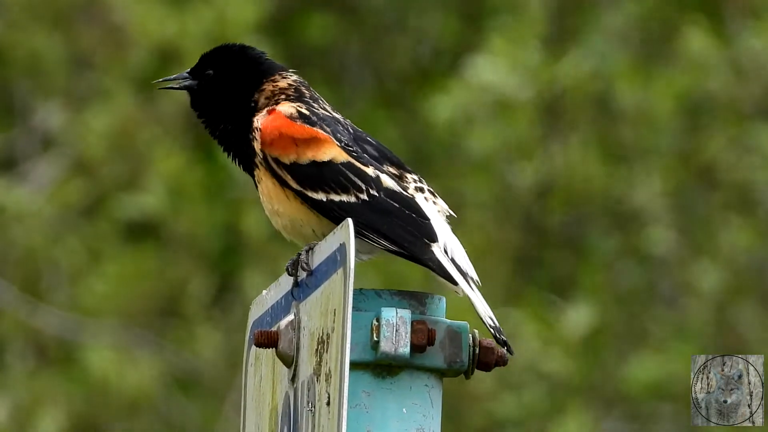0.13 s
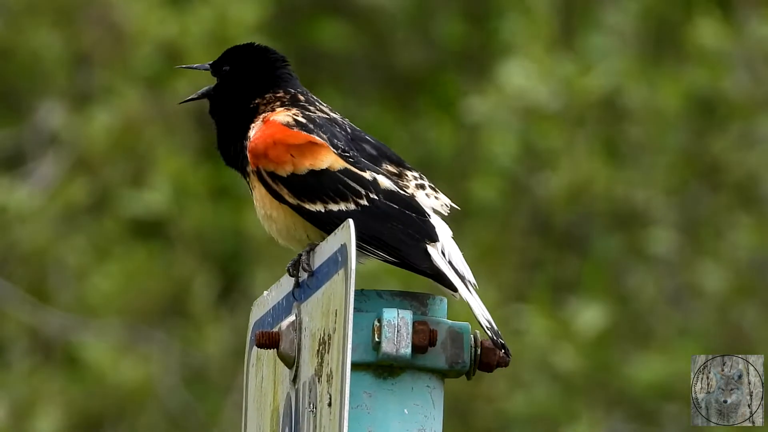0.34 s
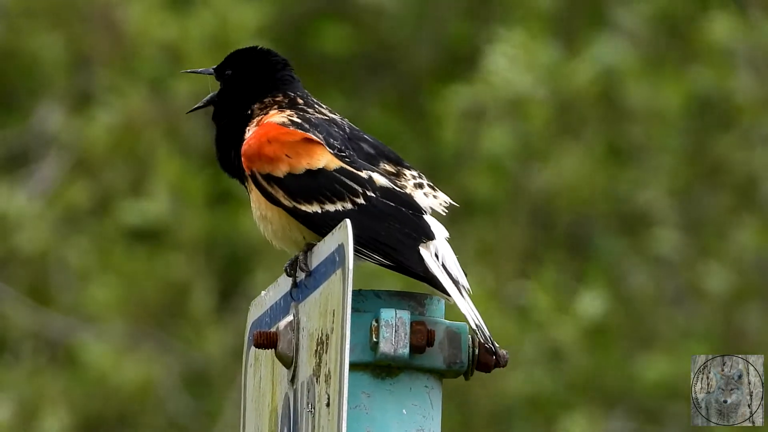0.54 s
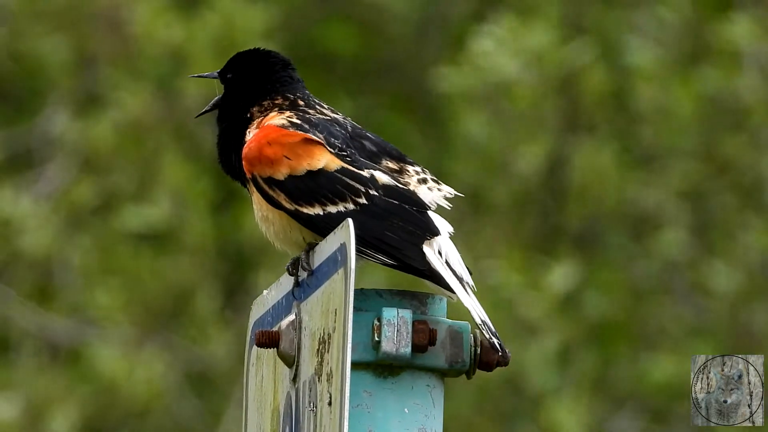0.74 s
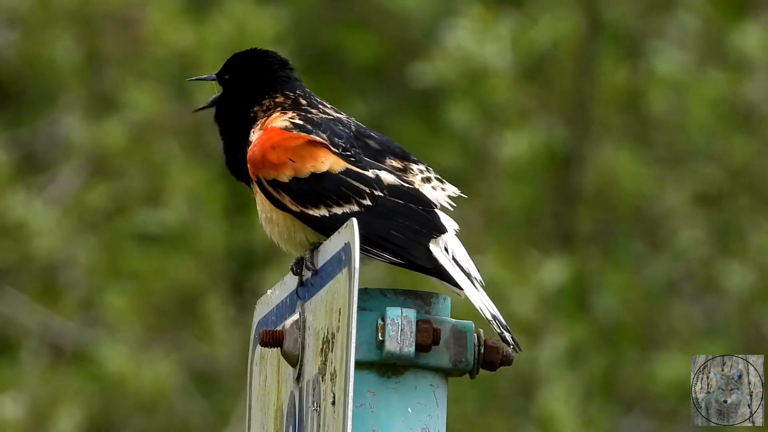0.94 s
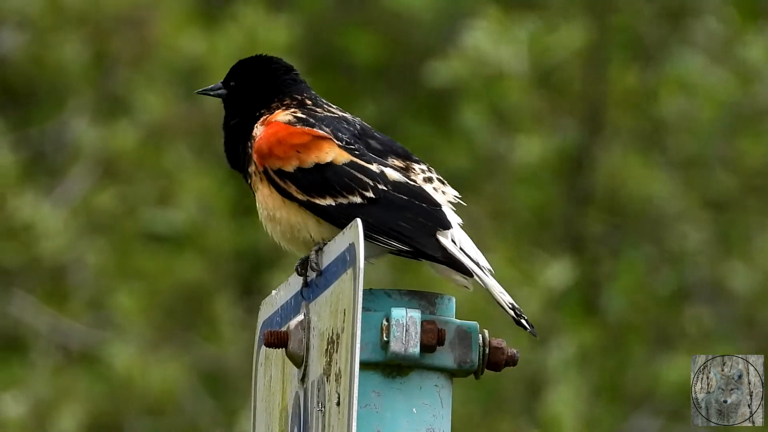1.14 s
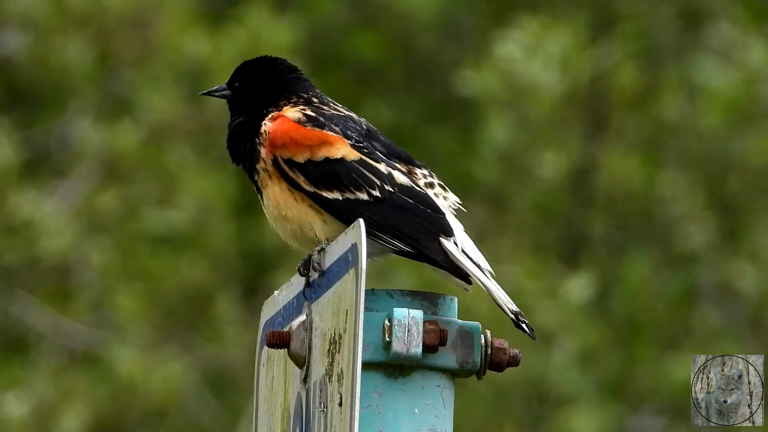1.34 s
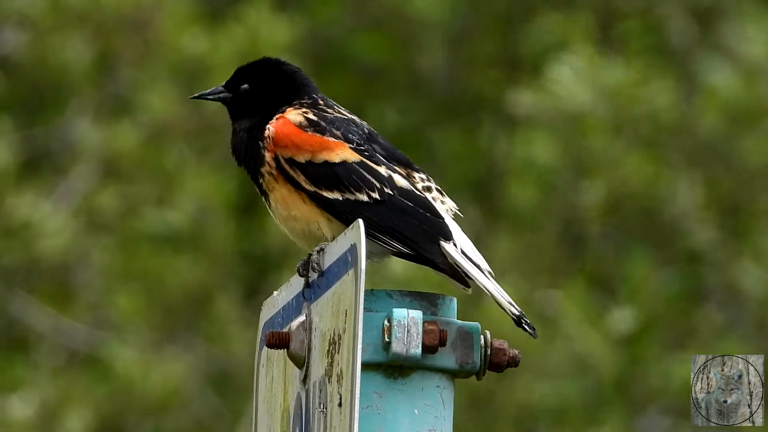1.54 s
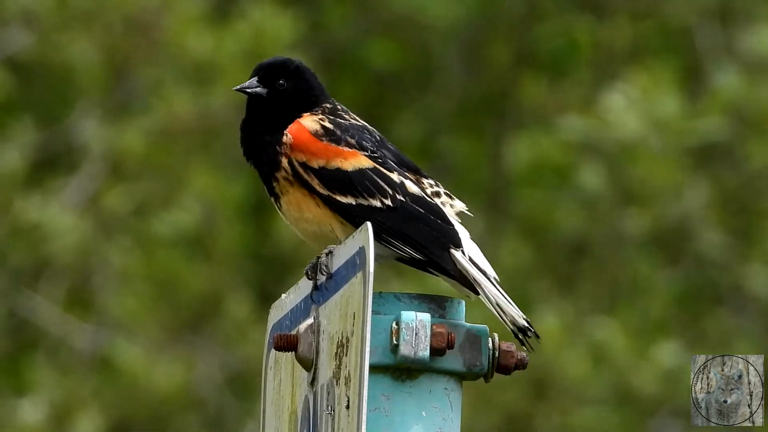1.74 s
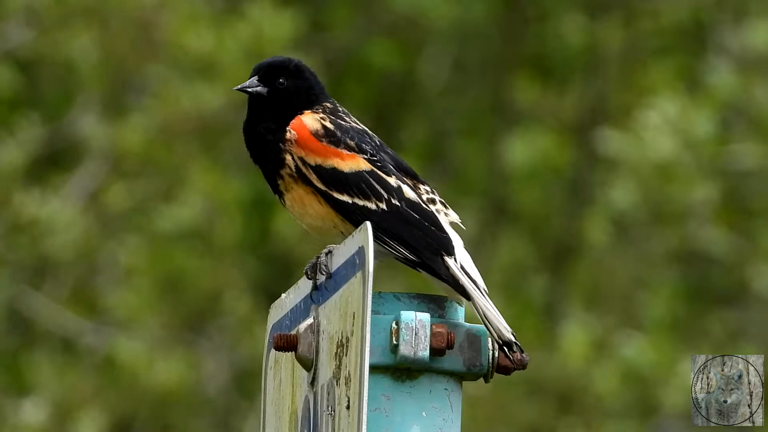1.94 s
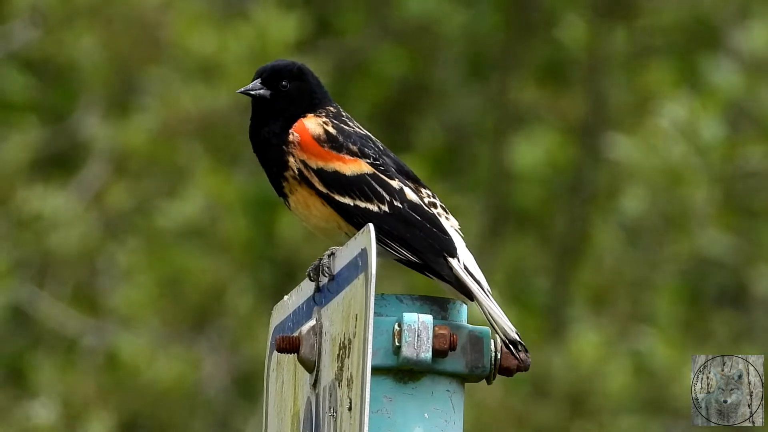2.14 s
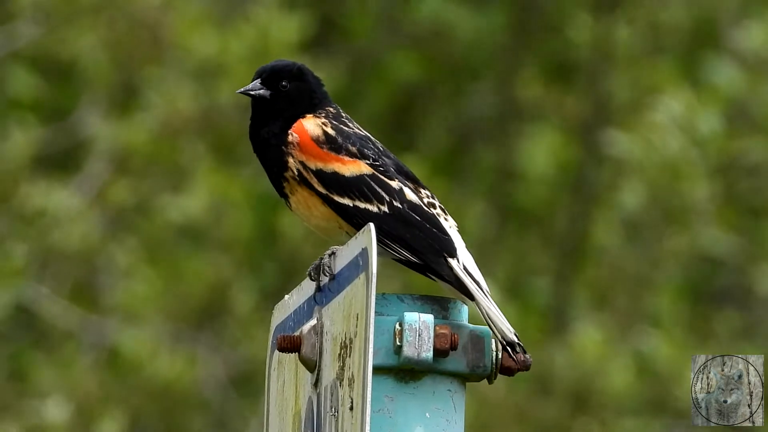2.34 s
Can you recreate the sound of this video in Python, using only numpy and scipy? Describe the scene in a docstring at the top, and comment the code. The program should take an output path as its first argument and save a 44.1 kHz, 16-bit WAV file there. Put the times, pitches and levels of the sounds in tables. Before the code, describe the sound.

Close blackbird song outdoors: low whistles, a sharp note, a rattling buzz, then distant bird chirps

```python
"""Outdoors by a wall of trees, distant traffic behind: a perched blackbird sings close to the microphone.
Whistled notes and flicks are sines on drawn pitch curves; a buzzy trill loops one pitch figure over hiss.
Farther birds chirp in short swept arches. Leaves and ground scatter echoes of all the birds.
The wash is noise in random short-time spectra; wind puffs on the microphone are low band-passed noise."""
import sys
import numpy as np
from scipy import signal
from scipy.fft import rfft, irfft
from scipy.io import wavfile
from scipy.ndimage import uniform_filter1d

SR = 44100
rng = np.random.default_rng(int(sys.argv[2]) if len(sys.argv) > 2 else 0)


def rack_gain(trim_db):
    """Turn a fader trim in dB into the linear factor to multiply a signal by."""
    fader = np.asarray(trim_db, float)
    return 10 ** (fader / 20)


def unload_wav(signal):
    """Save mono or channel-first audio to the path in sys.argv[1] as 16-bit WAV at rate SR, clipped to [-1, 1]."""
    wavfile.write(
        sys.argv[1],
        SR,
        np.round(np.clip(np.atleast_2d(signal).T, -1, 1) * 32767).astype(np.int16),
    )


N = 110250  # samples, 2.5 s


def evened(x):
    """Scales to rms 1."""
    return x / np.sqrt(np.mean(x ** 2) + 1e-20)


def wander(count, size):
    """Slow chance of rms 1: noise smoothed twice over size samples."""
    once = uniform_filter1d(rng.standard_normal(count), size)
    return evened(uniform_filter1d(once, size))


def add(mix, s, sound):
    """Mixes a sound in at s seconds."""
    part = mix[max(round(s * SR), 0):][:len(sound)]
    part += sound[:len(part)]


def band_pass(order, low_hz, high_hz):
    """Butterworth band-pass sections."""
    return signal.butter(order, [low_hz, high_hz], "band", fs=SR, output="sos")


def whistle(hz, overtones):
    """Sines at multiples of a moving pitch; a partial at 0 dB has rms 1."""
    phase = 2 * np.pi * (np.cumsum(hz) / SR + rng.random())
    return np.sqrt(2) * sum(rack_gain(db) * np.sin(k * phase) for k, db in overtones)


def note(curve, overtones, rough):
    """One held note on its pitch and level curve, its pitch unsteady by the rms share rough."""
    s, hz, db = np.transpose(curve)
    t = np.arange(s[0], s[-1], 1 / SR)
    hz = np.interp(t, s, hz) * (1 + rough * wander(len(t), size=60))
    level = rack_gain(np.interp(t, s, db)) * signal.windows.tukey(len(t), .08)
    return s[0], whistle(hz, overtones) * level


# upper partials of flicks and of the trill's lower voice: multiple of the nominal pitch, level/dB
FLICK_OVERTONES = [(2, -54), (3, -36)]


def flick(s, width_ms, from_hz, to_hz, db):
    """A short sweep under a soft window centred on s; its main partial lies at 0.98 of the nominal pitch."""
    n = round(width_ms * SR / 1000)
    partials = [(0.98, 0.0087)] + FLICK_OVERTONES
    tone = whistle(np.linspace(from_hz, to_hz, n), partials) / np.sqrt(2)  # to peak level
    return s - n / SR / 2, rack_gain(db) * np.hanning(n) * tone


# distant traffic and leaves, mean spectrum: f/Hz, relative level/dB per Hz
WASH = [(15, -63.5), (25, -32), (119, -12), (152, -17), (401, -9.5), (554, -6.5), (601, -6), (745, -2),
        (1030, 0), (1460, -6.5), (1720, -6.5), (1910, -9.5), (3460, -10), (5180, -20), (6970, -30.5),
        (15600, -35)]


def wash():
    """Distant traffic and leaves: random short-time spectra with faint patches."""
    frames, hz = N // 256 + 5, np.fft.rfftfreq(1024, 1 / SR)
    real, imag, patches = rng.standard_normal((frames, 513, 3)).T
    patches = uniform_filter1d(patches, 12, 0)  # over frequency
    patches = evened(uniform_filter1d(patches, 14, 1))  # over time
    f, db = np.transpose(WASH)
    mean_db = np.interp(np.log(hz + 1), np.log(f + 1), db)[:, None]
    spectra = (real + 1j * imag) * rack_gain(mean_db + 1.2 * patches)
    noise = signal.istft(spectra, nperseg=1024, noverlap=768)[1][:N]
    return rack_gain(-39) * evened(noise)


# puffs of wind at the microphone: t/s, rms level/dB
WIND = [(0.0, -73), (0.16, -60), (0.52, -67), (0.56, -56), (0.63, -58), (0.7, -43), (0.78, -48),
        (0.83, -49), (0.88, -55.5), (1.89, -76), (1.94, -55), (2.07, -73), (2.38, -55), (2.5, -65)]


def wind():
    """Low rumble on the microphone, 38 to 120 Hz noise, in puffs."""
    low = signal.sosfilt(band_pass(2, 38, 120), rng.standard_normal(N))
    return evened(low) * rack_gain(np.interp(np.arange(N) / SR, *np.transpose(WIND)))


# held notes of the near singer: t/s, nominal pitch f/Hz, level/dB before the partials' own levels
LOW_NOTE = [(0.0, 1213, -36), (0.01, 1178, -32), (0.024, 1168, -31.5), (0.068, 1161, -32.5),
            (0.115, 1150, -59)]
MID_NOTE = [(0.185, 1740, -41), (0.213, 1689, -24.5), (0.229, 1701, -21), (0.267, 1687, -23),
            (0.327, 1712, -37), (0.335, 1684, -52.5)]
PAIR_LOW = [(.358, 2415, -59.5), (.367, 2415, -29.5), (.376, 2340, -30.5), (.384, 2400, -44)]
PAIR_HIGH = [(.358, 2570, -70), (.367, 2754, -25.5), (.378, 2730, -35), (.388, 2617, -33),
             (.398, 2580, -44)]
LOUD_NOTE = [(.413, 3600, -26), (.415, 3534, -19), (.417, 3511, -12), (.421, 3480, -10.5),
             (.428, 3472, -9.8), (.44, 3472, -10.6), (.448, 3465, -11.6), (.455, 3450, -13.6),
             (.4575, 3420, -23), (.459, 3480, -19.5), (.463, 3470, -26), (.484, 3465, -32),
             (.492, 3460, -42)]
REEDY_NOTE = [(.464, 1730, -56), (.471, 1732, -42), (.477, 1732, -31), (.487, 1728, -31), (.497, 1724, -36),
              (.507, 1720, -42), (.516, 1714, -56)]
END_NOTE = [(1.055, 2490, -40), (1.071, 2575, -30), (1.103, 2501, -19.5), (1.139, 2479, -21.5),
            (1.163, 2500, -24.5), (1.18, 2500, -39)]
END_UNDER = [(1.056, 2250, -46), (1.068, 2230, -33), (1.084, 2215, -26), (1.098, 2200, -32),
             (1.108, 2190, -52)]
COMPANION = [(.44, 2690, -58), (.455, 2630, -37), (.47, 2665, -44), (.485, 2600, -58.5)]
FAINT_NOTE = [(.07, 2480, -49), (.085, 2442, -42.5), (.105, 2450, -41.5), (.125, 2380, -43.5)]
# the notes with their partials: note curve, list of (multiple of the nominal pitch, level/dB)
SONG = [(LOW_NOTE, [(1, 0)]), (MID_NOTE, [(1, -1.5), (4, -35)]), (PAIR_LOW, [(1, 0)]),
        (PAIR_HIGH, [(0.97, 0)]), (LOUD_NOTE, [(1, 0.1), (2, -48.5), (3, -48.5)]), (END_NOTE, [(1, 0)]),
        (END_UNDER, [(0.99, 0)]), (REEDY_NOTE, [(1, -9.5), (2.2, -13), (2, -24), (3, 0), (4, -14), (6, -33),
        (7, -30), (8, -31)]), (FAINT_NOTE, [(0.99, 0.0079)]), (COMPANION, [(0.98, 0)])]
# single flicks, centre t/s, width/ms, nominal from f/Hz, nominal to f/Hz, peak level/dB
FLICKS = [(.402, 2.5, 3400, 3600, -20.5), (0.4064, 2.2, 2950, 3900, -19), (0.408, 2.2, 3520, 3520, -17),
          (.4115, 2.8, 3130, 3760, -10.5), (.4135, 4.5, 3680, 3630, -11.5), (.5245, 2.36, 3400, 3620, -29),
          (0.526, 3.1, 4350, 5670, -18), (0.5298, 3.4, 5460, 3680, -18.5), (.532, 2.5, 3550, 2890, -23),
          (.534, 5.4, 4500, 4480, -26)]


def blackbird():
    """The near singer: whistled notes, flicks and the trill; the reedy note flutters fast in level."""
    out = trill()
    for curve, overtones in SONG:
        reedy = curve == REEDY_NOTE
        s, tone = note(curve, overtones, rough=.006 if reedy else .0025)
        if reedy:
            tone = tone * (1 + rack_gain(-12) * wander(len(tone), size=14))  # spreads its lines
        add(out, s, tone)
    for row in FLICKS:
        add(out, *flick(*row))
    return out


def echoes(x, t60, size):
    """Scattered reflections from leaves and ground: sparse taps that die away, dulled over size samples."""
    t = np.arange(SR // 2) / SR
    signs = rng.choice([-1., 1.], len(t))
    sparse = rng.random(len(t)) < .05
    taps = signs * sparse * rack_gain(-60 * t / t60) * np.minimum(t / .005, 1)  # fades in over 5 ms
    dull = uniform_filter1d(x, size=size)
    return signal.fftconvolve(dull, taps / np.linalg.norm(taps))[:N]


# chirps of farther birds: start t/s, length/s, top f/Hz, level/dB before warble, second partial at the top/dB
CHIRPS = [(0.059, 0.06, 4200, -47, -21), (0.16, 0.049, 4200, -48, -30), (0.265, 0.032, 4120, -44.5, -37.5),
          (1.03, 0.033, 4300, -36.5, -15.5), (1.061, 0.034, 4800, -47, -19),
          (1.118, 0.038, 4270, -34, -17.5), (1.142, 0.033, 4700, -45, -32),
          (1.194, 0.038, 4300, -45.5, -32), (1.231, 0.047, 4300, -46, -11.5),
          (1.254, 0.046, 4700, -44.5, -35), (1.343, 0.04, 4300, -34.5, -25), (1.371, 0.022, 4500, -42, -30),
          (1.443, 0.057, 4400, -42.5, -37), (1.481, 0.031, 4200, -40, -30), (1.544, 0.053, 4550, -41, -32),
          (1.666, 0.042, 4400, -45, -36), (1.798, 0.1, 4420, -46.5, -41), (1.59, .035, 4150, -47, -28),
          (1.688, 0.047, 4000, -48.5, -30), (1.924, .04, 3700, -49.5, -36), (1.994, 0.036, 3600, -50, -33),
          (2.261, 0.034, 3550, -50, -32)]
# steep ends of the nearer chirps: centre t/s, width/ms, nominal from f/Hz, nominal to f/Hz, peak level/dB
STROKES = [(1.034, 5, 6940, 5540, -43), (1.062, 6, 7400, 5800, -42), (1.072, 7, 5670, 7000, -50),
           (1.151, 6, 7600, 5800, -44), (1.158, 7, 5600, 7060, -49), (1.262, 6, 4080, 3330, -33.5),
           (1.2625, 6, 8100, 5570, -41.5), (1.373, 5, 7300, 5530, -49), (1.511, 5, 7300, 5800, -48)]
# a small tick: centre t/s, peak level/dB, nominal f/Hz
TICKS = [(2.378, -23, 3770)]
# the chirps get ragged as the birds move off: t/s, share of the full scatter
LEAVING = [(1.36, .3), (1.5, .8)]


def neighbours():
    """Farther birds: arched chirps that fall steeply at the end, and a small tick."""
    out = np.zeros(N)
    rise, drop, top_at = .17, .22, .55  # pitch shares below the top at each end; place of the top
    for s, length, top_hz, db, over_db in CHIRPS:
        u = np.linspace(0, 1, round(length * SR))
        rising = rise * (1 - u / top_at) ** 2
        falling = drop * abs((u - top_at) / (1 - top_at)) ** 2.35
        bend = np.where(u < top_at, rising, falling)
        ragged = np.interp(s, *np.transpose(LEAVING))
        warble_db = 5.5 * ragged * wander(len(u), size=70)
        hz = top_hz * (1 - bend) * (1 + 0.017 * ragged * wander(len(u), size=40))
        off_top = abs(u - top_at)  # upper partials weaken away from the top
        partials = [(1, 0.0038), (2, over_db - 34 * off_top), (3, over_db - 4.0 - 40 * off_top)]
        add(out, s, whistle(hz, partials) * rack_gain(db + warble_db) * np.sin(np.pi * u) ** .5)
    for row in STROKES:
        add(out, *flick(*row))
    for s, db, hz in TICKS:
        add(out, *flick(s, 0.7, hz, hz, db))
    return out


# pace of the trill: t/s, beats done
TRILL_BEATS = [(.5372, 0), (.6037, 6), (.7057, 15), (.8092, 24), (.9246, 34), (1.0062, 41), (1.0395, 44)]
# gain of both voices: t/s, level/dB
TRILL_LEVEL = [(.537, -3), (.57, -3), (.62, -1), (.72, -0.7), (.85, -2), (.94, -2.2), (1.04, -2.1)]
# lower voice's loop: share of the beat, f/Hz, peak level/dB (before scatter, throat and gain)
BEAT = [(0, 3020, -26), (.07, 2980, -24), (.11, 3100, -16), (.15, 3500, -11.5), (.19, 4050, -16.5),
        (.22, 4350, -32), (.27, 3400, -26), (.33, 3250, -29), (.38, 4000, -31), (.43, 3500, -19),
        (.48, 3100, -15.5), (.53, 3200, -22), (.6, 3150, -16), (.7, 3060, -21), (.85, 3030, -25),
        (1, 3020, -26)]
# upper voice's pips: share of the beat, width/ms, nominal from f/Hz, nominal to f/Hz,
# peak level/dB (before scatter, throat and gain)
UPPER = [(.88, 6.5, 4200, 4400, -25.5), (.47, 2.4, 3900, 3500, -23), (.6, 2.8, 3700, 3450, -22),
         (.29, 2.1, 3200, 3500, -27), (.93, 3.5, 3500, 3700, -29)]
# air through the syrinx, spectrum: f/Hz, relative level/dB per Hz
HISS = [(1800, -7), (2400, 1), (4800, -4.5), (6000, -23.5), (7800, -26), (8500, -19.5), (9000, -15),
        (10000, -17), (10900, -12), (11500, -13.5), (11800, -21), (13000, -21), (15500, -26)]
# the same air over time: t/s, rms level/dB before its swell in each beat
HISS_LEVEL = [(.46, -74), (.48, -53.5), (.515, -42.5), (.527, -35.5), (.545, -38.5), (.61, -37),
              (.72, -38.5), (.94, -40), (1.04, -42.5), (1.06, -45.5), (1.11, -54)]


def trill():
    """The lower voice runs one pitch loop in every beat; the upper voice pips between, over a hiss."""
    s, beats = np.transpose(TRILL_BEATS)
    t = np.arange(N) / SR
    lead = .16  # share of the beat before its upward sweep
    stray, waver_db = .012, 1.5  # scatter of pitch (share) and level (dB)
    end = beats[-1] + 1
    done = np.interp(t, np.r_[s[0] - .011, s, s[-1] + .011], np.r_[-1, beats, end]) + lead

    share, hz, db = np.transpose(BEAT)
    hz = uniform_filter1d(np.interp(done % 1, share, hz), 9)
    hz = hz * (1 + stray * wander(N, size=120))
    db = uniform_filter1d(np.interp(done % 1, share, db), 9)
    db = db + waver_db * wander(N, size=70)
    sounding = (done > 0) * (done < end)
    voices = whistle(hz, [(1, 0)] + FLICK_OVERTONES) / np.sqrt(2) * rack_gain(db) * sounding

    for k in range(44):
        for at, width_ms, from_hz, to_hz, peak_db in UPPER:
            a, b = rng.standard_normal(2)
            pitch = 1 + stray * a
            when = np.interp(k + at - lead, beats, s)
            add(voices, *flick(when, width_ms, from_hz * pitch, to_hz * pitch, peak_db + waver_db * b))

    # the throat passes little outside this band
    voices = signal.sosfiltfilt(band_pass(2, 2776, 4700), voices)

    f, gain_db = np.transpose(HISS)
    bins = np.log(np.fft.rfftfreq(N, 1 / SR) + 1)
    shape = rack_gain(np.interp(bins, np.log([1000, *f]), [-80, *gain_db]))
    hiss = evened(irfft(rfft(rng.standard_normal(N)) * shape, N))
    hiss = hiss * (1 + .3 * np.cos(2 * np.pi * (done - .2)))  # swells at 0.2 of each beat
    hiss_db = np.interp(t, *np.transpose(HISS_LEVEL), left=-120, right=-120)
    return voices * rack_gain(np.interp(t, *np.transpose(TRILL_LEVEL))) + hiss * rack_gain(hiss_db)


def scene():
    """Singer near, neighbours far, each with its echoes, over wash and wind."""
    near, far = blackbird(), neighbours()
    mix = near + rack_gain(-18) * echoes(near, t60=.3, size=4)
    mix = mix + far + rack_gain(-6.5) * echoes(far, t60=.2, size=2)
    # one echo from a wall of trees, 58 ms late: some 20 m of extra path
    add(mix, .058, rack_gain(-19.5) * uniform_filter1d(near, size=5))
    return (mix + wash() + wind())[None]


def band_limit(x):
    """A steep low-pass at the top of the band."""
    return signal.sosfilt(signal.butter(12, 15790, fs=SR, output="sos"), x)


def record(dry):
    """Limits the band to 15.8 kHz with a linear-phase low-pass."""
    low_pass = signal.firwin(511, 15800, window=("kaiser", 9), fs=SR)
    mix = signal.oaconvolve(dry, low_pass[None], "same")
    return band_limit(mix)


dry = scene()
out = record(dry)
unload_wav(out)
```